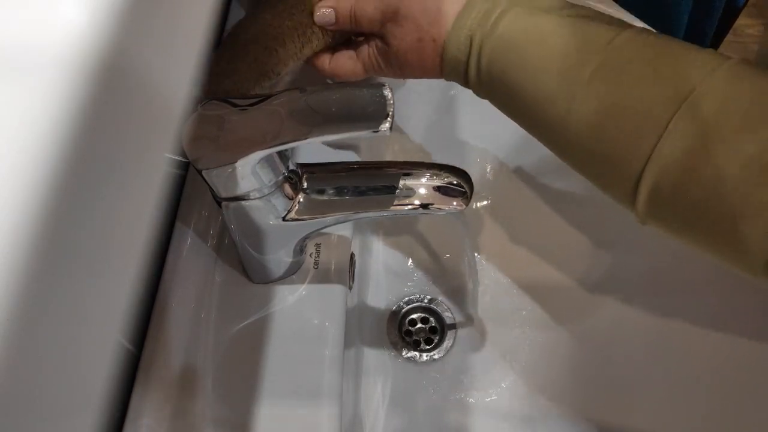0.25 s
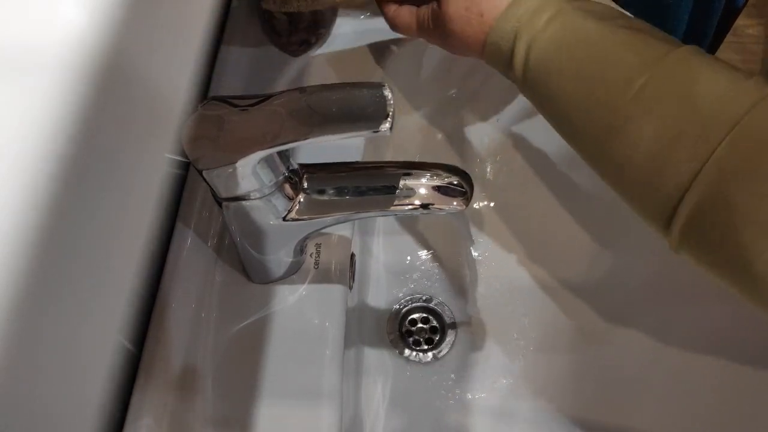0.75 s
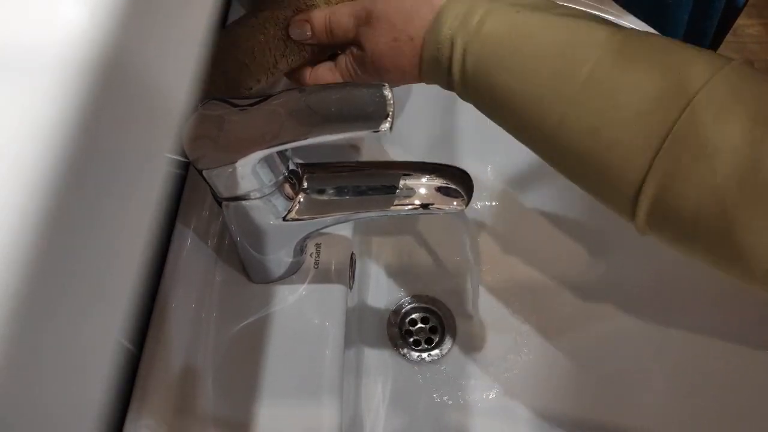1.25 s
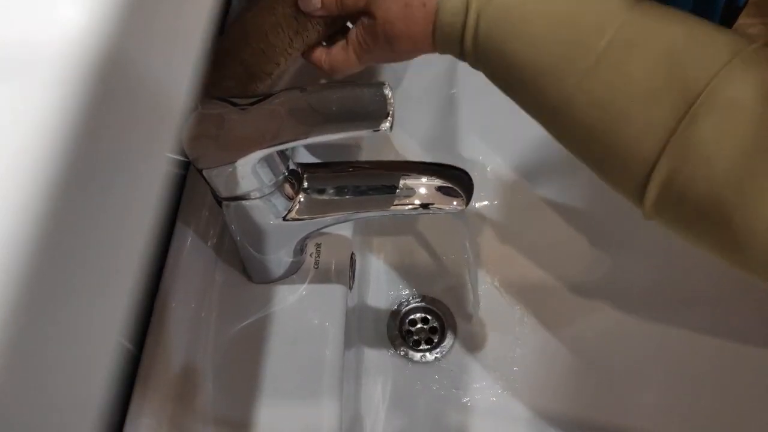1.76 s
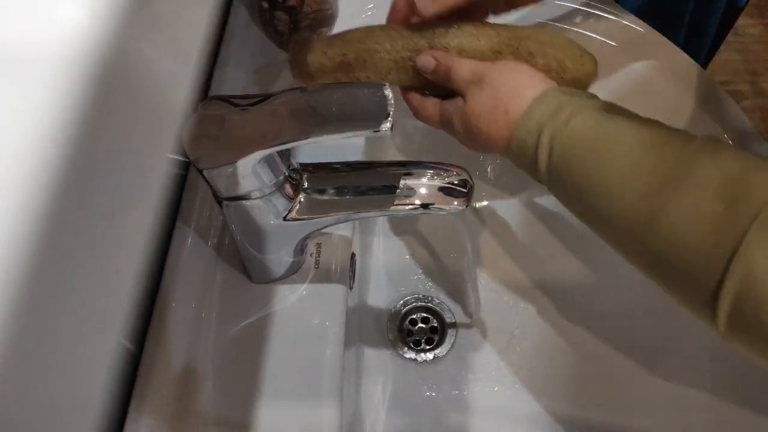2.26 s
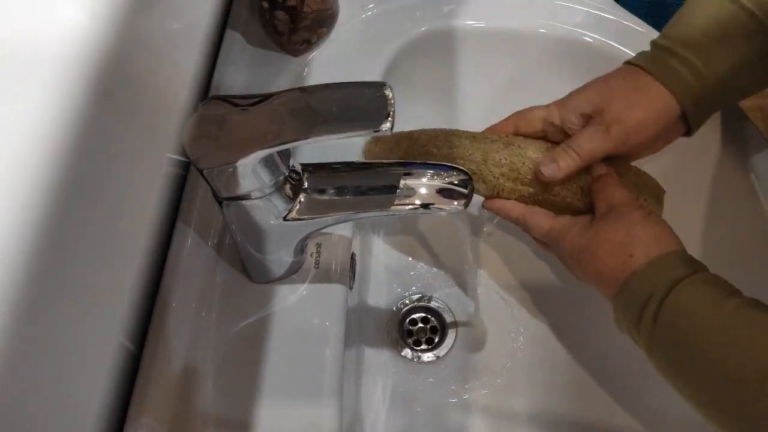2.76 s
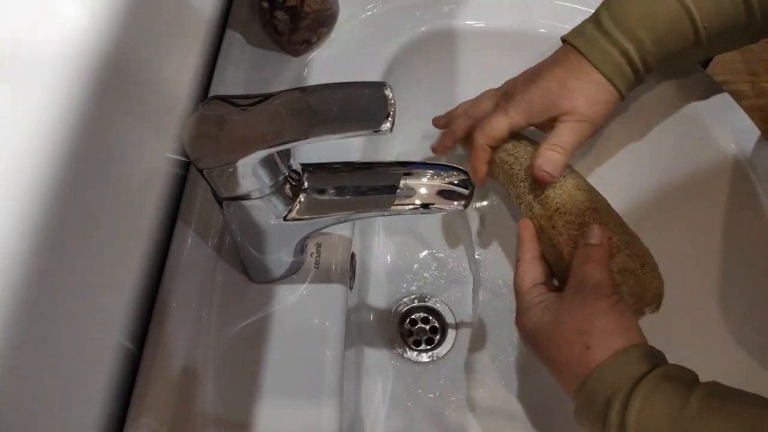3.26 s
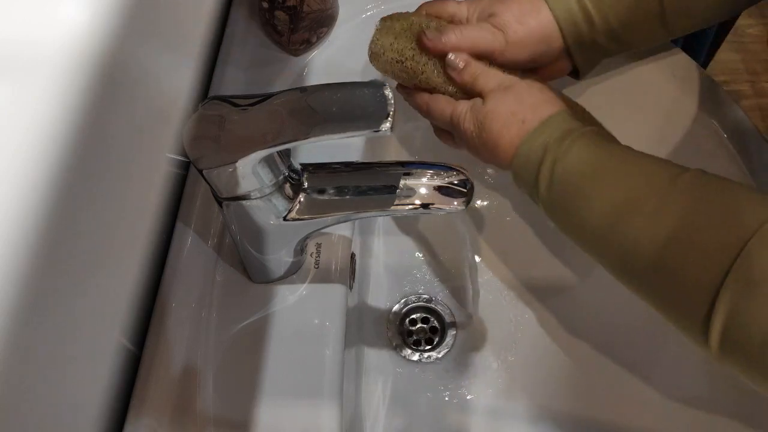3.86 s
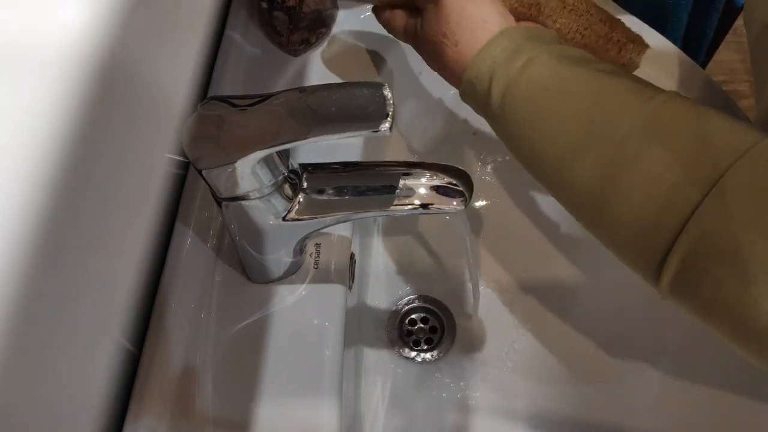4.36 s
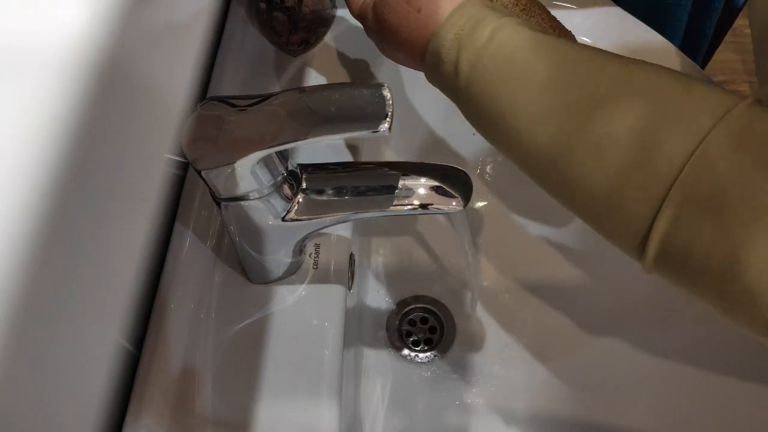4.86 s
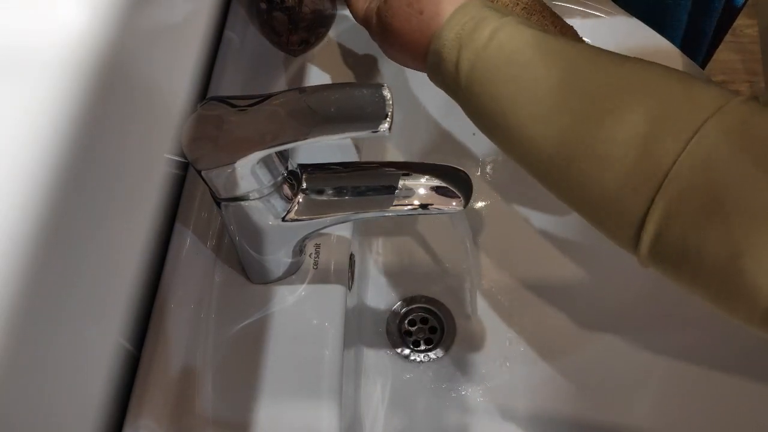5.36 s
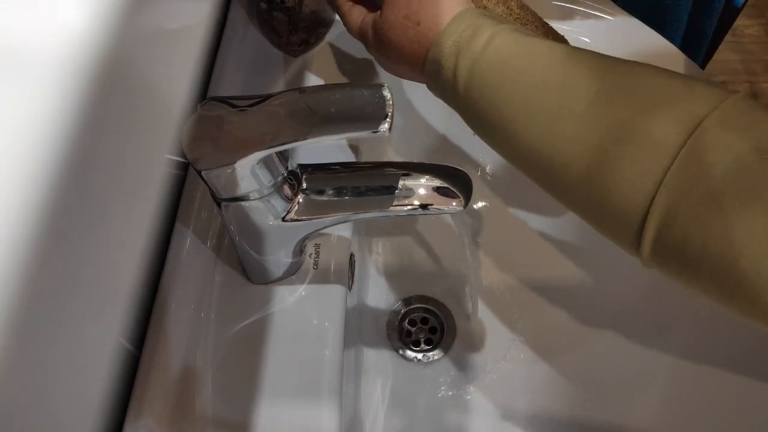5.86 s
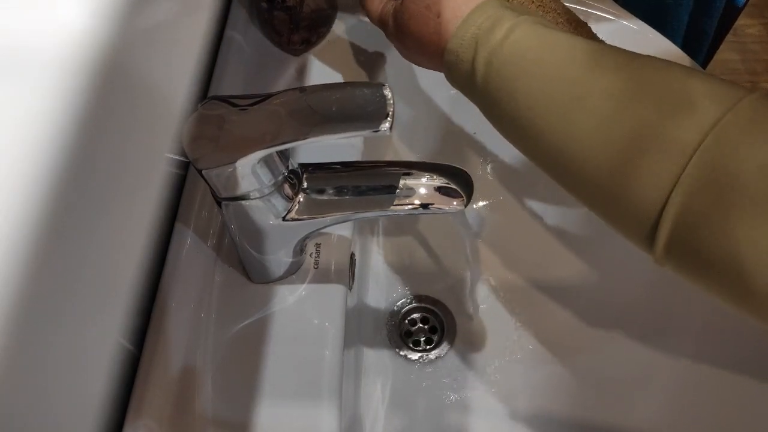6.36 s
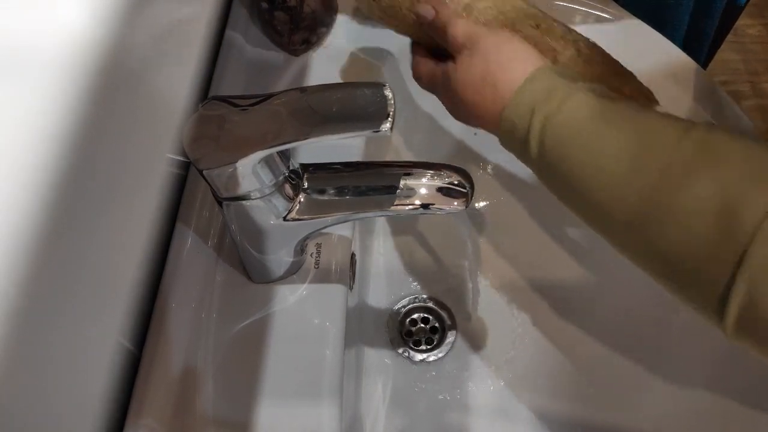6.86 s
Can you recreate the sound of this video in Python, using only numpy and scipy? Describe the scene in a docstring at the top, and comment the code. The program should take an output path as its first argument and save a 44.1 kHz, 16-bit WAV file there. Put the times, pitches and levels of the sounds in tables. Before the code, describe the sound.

Close up in a small bathroom, tap water hisses and splashes into a ceramic sink throughout, with tiny bubbles snapping. For the first two seconds a wet sponge scrubs the rim with hollow knocks. Light, wet squishes and a faint drain gurgle follow. From about four seconds the scrubbing and knocking return, drawing a low drone from the cabinet over a quiet room rumble.

```python
"""A tap runs into a ceramic basin, close by in a small bathroom. From the start its airy stream
fizzes with tiny bursting bubbles, spits now and then and drums on the basin floor. For the first
two seconds a hand works a wet sponge against the rim, knocking and rubbing so that the basin rings.
Then the sponge is wetted and squelches, and the drain gives one faint, low gurgle. Just after four
seconds a second round of strokes begins, and late in it the cabinet drones. The room rumbles softly."""
import sys
import numpy as np
from scipy import signal
from scipy.fft import rfft, irfft
from scipy.io import wavfile
from scipy.ndimage import uniform_filter1d

SR = 44100
rng = np.random.default_rng(int(sys.argv[2]) if len(sys.argv) > 2 else 0)


def wav_record(signal):
    """Record a signal, one row per channel, as 16-bit PCM in the file named by sys.argv[1]."""
    frames = np.transpose(np.atleast_2d(signal))
    bounded = np.clip(frames, -1, 1)
    # unit amplitude maps onto the largest positive 16-bit level
    quanta = np.round(bounded * 32767).astype(np.int16)
    wavfile.write(sys.argv[1], SR, quanta)


N = 313551
TIME = np.arange(N) / SR
HIGHEST_HZ = 15850

# How the splash swells and sinks as the hands disturb it: time_s, change_db
SPLASH_SWELLS = [(0.0, 1), (0.11, -1.5), (0.18, -4), (0.25, 2), (0.62, 1), (0.74, -0.5), (0.95, 0.5),
                 (1.3, -1.5), (1.9, -1), (2.13, 1.5), (2.4, -1.5), (3.4, 0), (4.4, 0), (4.9, -1), (5.9, -1),
                 (6.08, 1.5), (6.55, 0.5), (7.1, -0.5)]
# How strong the stream's hiss is from low to high: pitch_hz, level_db
STREAM_TONE = [(300, -21), (900, -24), (1300, -19), (2200, -14.5), (3100, -6), (3700, -6.5), (5000, -3),
               (6500, 3), (7500, 1), (9800, 1.5), (11800, 1.5), (14000, 5.5), (15000, 8.5), (16000, -24)]
# Pitches that the air in the bowl boosts or weakens: pitch_hz, width_hz, boost_db
BOWL_RESONANCES = [(1518, 137, 12.5), (1792, 33, 12), (1950, 90, 3), (2120, 190, 8.5), (2420, 34, 1),
                   (2605, 57, 11.5), (2920, 75, -7), (3120, 46, -14), (3585, 41, 1.5), (4990, 69, 9),
                   (5344, 35, 8.5), (6190, 39, 5.5), (7530, 110, 4.5), (7360, 120, 1.5), (8300, 160, 4),
                   (9170, 95, 8), (11100, 120, 6.5)]


def tap_stream(level_db):
    """Bubbles burst over a smooth hiss of foam; the jet flutters and the bowl shapes its tone."""
    fizz = bubbles(per_s=1100, spread_db=4.5, cycles=0.76, echo_db=-2.5)
    foam = amp(-1) * rng.standard_normal((2, N))
    drips = amp(-10.5) * bubbles(per_s=70, spread_db=4, cycles=3.5, echo_db=-6)
    wash = amp(-1) * unit_level(band(rng.standard_normal((2, N)), 390, 3900))  # the film of water
    water = fizz + foam + drips + wash
    # The stream stays in one place, so its echoes off the walls give a steady, hollow tone.
    mono = water.sum(0, keepdims=True) / np.sqrt(2)
    water += amp(-6.5) * signal.oaconvolve(mono, echoes(fade_s=0.044), axes=1)[:, :N]
    # Cut the sound into short slices, so that each pitch can waver by itself.
    hz, t, slices = signal.stft(water, SR, nperseg=512, noverlap=384)
    patches = uniform_filter1d(rng.standard_normal((len(t), len(hz))), size=8, axis=0)
    patches = unit_level(uniform_filter1d(patches, size=14, axis=1)).T
    flutter = wobble(len(t), smooth=4)
    swell = np.interp(t, *np.transpose(SPLASH_SWELLS)) + 0.77 * surges(t)
    fizz_swell = at_pitch([(8000, 0), (12000, 0.85)], hz)[:, None] * 0.84 * surges(t)
    depth = at_pitch([(2500, 0.13), (5500, 0.89)], hz)[:, None]  # the low wash is steadier than the spray
    slices = slices * amp(depth * (swell + fizz_swell + 0.37 * patches + 1.08 * flutter))
    water = signal.istft(slices, SR, nperseg=512, noverlap=384)[1][:, :N]
    hz = np.fft.rfftfreq(N, 1 / SR)
    bowl_db = sum(db / (1 + (2 * (hz - pitch) / width) ** 2) for pitch, width, db in BOWL_RESONANCES)
    water = irfft(rfft(water) * amp(at_pitch(STREAM_TONE, hz) + bowl_db), N)
    return amp(level_db) * unit_level(water) * amp([[-1], [0]])  # a little softer on the left


def bubbles(per_s, spread_db, cycles, echo_db, sizes=40):
    """Bubbles of many sizes burst at random, each size at its own spot in the bowl."""
    out = np.zeros((2, N))
    for hz in np.linspace(3500, 15500, sizes):
        chance = rng.random(N)
        strength = np.minimum(rng.exponential(1, N), 3)
        paths = amp(echo_db) * echoes(fade_s=0.23, size=2048) + echoes(fade_s=0.0092, size=2048)
        paths[[0, 1], rng.integers(0, 4, 2)] += 1  # the straight path to each ear
        burst = signal.fftconvolve(paths, pop(hz, cycles)[None], axes=1)
        for i in np.flatnonzero(chance < per_s / sizes / SR):
            add(out, i / SR, amp(spread_db * strength[i]) * burst)
    return unit_level(out)


def pop(hz, cycles, size=192):
    """One bursting bubble: a tiny tone that swells for the given cycles, then dies."""
    turns = np.arange(size) / SR * min(hz, HIGHEST_HZ)
    wave = turns * np.exp(-turns / cycles) * np.sin(2 * np.pi * turns)
    return wave / np.linalg.norm(wave)


# Larger bubbles that snap in the stream and on the sponge: start_s, strength_db, pitch_hz, spray_db
BUBBLE_SNAPS = [(0.3681, -25.5, 9830, -3), (0.4363, -31.5, 7250, 2), (0.5242, -30.5, 6600, -6),
                (0.6396, -31, 12100, 6), (0.9535, -30, 9700, -8), (1.0027, -30.5, 6800, 1),
                (1.209, -29, 14400, 3), (1.487, -31, 6800, -2), (1.6505, -25, 11000, 0),
                (1.8102, -30, 14200, 4), (1.9762, -27.5, 8700, -2), (2.2058, -30.5, 6460, 5),
                (2.3195, -32, 8000, -1), (3.224, -29, 7300, -6), (3.6732, -28.5, 5400, -1),
                (3.6989, -25, 9100, -5), (5.3486, -34, 7360, 10), (5.6404, -28, 14400, -3),
                (5.8531, -31, 14400, 0), (6.0585, -32.5, 6500, 0), (6.6866, -31, 8100, 0),
                (6.849, -29, 14200, 4), (7.0716, -28, 13900, -4)]


def spits(gain_db):
    """Larger bubbles snap in a quick cluster and throw a short spray; small ones join at random."""
    out = np.zeros((2, N))
    small = [(start, -33, 6000 + 8500 * dice, 5) for start, dice in random_times(per_s=2.5)]
    for start, strength_db, hz, spray_db in BUBBLE_SNAPS + small:
        cluster = amp(spray_db) * echoes(fade_s=0.13) + echoes(fade_s=0.011)
        cluster[:, 0] += 0.5
        snap = signal.fftconvolve(cluster, pop(hz, cycles=0.79)[None], axes=1)
        snap /= snap[:, :SR // 400].std()
        treble_db = at_pitch([(9000, -0.99), (14000, -1.3)], hz)
        add(out, start + 0.0008, amp(strength_db + gain_db + treble_db) * snap)
    return out


# The two rounds in which the sponge lies on the rim: start_s, end_s
SPONGE_ROUNDS = [(0.0, 2.3), (4.25, 6.4)]
# Knocks on the basin, plus one faint, low gurgle of the drain at 3.13 s:
# start_s, force_db, contact_ms, spot_db (how much the spot adds to the body of the sound)
KNOCKS_AND_GURGLE = [(0.214, -42.5, 1.3, -4.5), (0.317, -31.5, 1.4, -15.5), (0.448, -45, 0.14, -2.5),
                     (0.582, -54, 4.2, 0), (0.842, -46.5, 0.38, -1.5), (1.137, -45, 0.14, -2.5),
                     (1.259, -47.5, 1.05, -8), (1.412, -44, 0.15, -3), (1.687, -47, 0.13, -3),
                     (1.99, -47.5, 0.3, -1.5), (2.113, -59.5, 0.6, -4), (2.161, -33.5, 1.28, -20),
                     (3.126, -62.5, 0.8, 1), (4.07, -60, 0.5, -4), (4.544, -52.5, 0.39, -1),
                     (4.78, -50.5, 3.8, -7), (5.009, -51.5, 0.41, -2), (5.411, -55, 1, 2),
                     (5.433, -45, 0.99, -0.5), (5.473, -54.5, 0.8, -19), (5.744, -44.5, 3, -10),
                     (5.933, -56, 1.2, 0), (5.948, -53.5, 0.87, -14), (6.102, -54.5, 1.2, 1),
                     (6.117, -53, 0.1, -12), (6.125, -49, 0.8, -1.5), (6.278, -46, 1, -1),
                     (6.425, -45.5, 0.42, -2.5), (6.566, -53.5, 0.7, -8), (6.613, -43.5, 0.65, 0),
                     (6.72, -50, 0.22, -6)]


def knocks_and_gurgle(boom_db, body_db, ring_db, clack_db):
    """Soft knocks boom, hard ones ring and clack; the drain's gurgle sounds the same basin notes."""
    out = np.zeros((2, N))
    light_taps = [(start, -64 + 4 * dice, 0.91, 0)
                  for begin, end in SPONGE_ROUNDS for start, dice in random_times(2.0, begin, end)]
    for start, force_db, contact_ms, spot_db in KNOCKS_AND_GURGLE + light_taps:
        contact_s = contact_ms / 1000
        blow = basin_ring()
        t = np.arange(blow.shape[1]) / SR
        blow *= 1 - np.exp(-t / (0.26 * contact_s))  # a longer contact starts more gently
        # Late in round two the sponge presses on another spot, which favours the cabinet's lowest note.
        boom_hz = (185, 310) if start < 5.5 else (150, 255)
        boom, body = band(blow, *boom_hz), -band(blow, 340, 620)
        ring, clack = band(blow, 700, 1300), -band(blow, 1550, 4000)
        muting = np.hypot(1, contact_s * np.array([0, 460, 915, 2470]))  # high parts are muted most
        gains = amp(force_db + np.array([boom_db, body_db + spot_db, ring_db, clack_db])) / muting
        parts = [part / part[:, :SR // 25].std() for part in (boom, body, ring, clack)]
        add(out, start, sum(gain * part for gain, part in zip(gains, parts)))
    return out * amp([[-1], [0]])


# Notes at which the basin and its cabinet ring: pitch_hz, level_db, fade_s (time to drop by 60 dB)
BASIN_NOTES = [(143.4, -7.5, 0.6), (169.7, 4.5, 0.34), (226, -7, 0.26), (243.3, -1.5, 0.13),
               (281.4, -1.5, 0.25), (351, -3, 0.19), (376.3, -2, 0.16), (474.4, 0.5, 0.14),
               (667.4, -1.5, 0.1), (741, -11, 0.22), (843, -14, 0.028), (887, -19.5, 0.11),
               (929, -4.5, 0.091), (1043, -2.5, 0.03), (1120, -7, 0.1), (1218, -4, 0.11),
               (1322, -9.5, 0.11), (1570, -0.5, 0.055), (1693, -14.5, 0.18), (2060, -7.5, 0.1),
               (2510, -16, 0.11), (2660, -4, 0.11)]
# The dense clatter between those notes: pitch_hz, level_db
CLATTER_TONE = [(60, -46), (130, -58), (300, -1), (600, 6), (1200, -6.5), (1800, -6.5), (3000, 1.5),
                (4500, -7), (9000, -27)]
# How long that clatter lasts: pitch_hz, fade_s
CLATTER_FADES = [(150, 0.2), (500, 0.099), (1000, 0.2), (3000, 0.23), (8000, 0.086)]


def basin_ring(size=16384):
    """The basin's answer to one blow: a clatter, and notes whose balance depends on where it is hit."""
    t = np.arange(size) / SR
    hz, db, fade_s = np.transpose(BASIN_NOTES)[:, :, None]
    weight, side, shift = rng.standard_normal((3, len(BASIN_NOTES), 1))
    fades = amp(db + 3 * weight - 60 * t / fade_s)
    phase = 2 * np.pi * hz * t + 0.72 * shift
    lag = 0.31 * side * np.minimum(hz / 1000, 1)  # higher notes reach the two ears out of step
    notes = np.array([(fades * np.sin(phase + ear * lag)).sum(0) for ear in (-1, 1)])
    slice_hz, slice_s, slices = signal.stft(noise(CLATTER_TONE, size), SR, nperseg=256)
    slices *= amp(-60 * slice_s / at_pitch(CLATTER_FADES, slice_hz)[:, None])
    clatter = signal.istft(slices, SR, nperseg=256)[1][:, :size]
    punch = 1 + 1.34 * np.exp(-t / 0.0062)  # the blow is louder than the ring it leaves
    onset = 1 - np.exp(-t / 0.00026)
    return (notes * np.sqrt(punch) + amp(0.5) * clatter * punch) * onset


def sponge_rubbing(gain_db, cabinet_db):
    """The sponge grips and slips along the rim, which keeps the basin's low notes humming."""
    grip = amp(7 * np.tanh(wobble(N, smooth=900)))
    rub_tone = [(80, -6), (145, 5), (170, -4), (225, 0.5), (280, 4), (400, -5.5), (800, -5), (2000, -4)]
    friction = noise(rub_tone) * grip
    hum = np.zeros((2, N))
    for hz, db, fade_s in BASIN_NOTES:
        sharpness = hz * fade_s * np.pi / np.log(1000)  # a note that rings longer is purer
        hum += amp(db) * fade_s * signal.lfilter(*signal.iirpeak(hz, sharpness, SR), friction)
    cabinet = unit_level(band(hum, 158, 182)) * np.interp(TIME, [5, 5.5], [0, 1])  # drones in late
    return amp(gain_db) * (unit_level(band(hum, 130, 2400)) + amp(cabinet_db) * cabinet) * pressure()


# Strokes of the sponge along the rim: start_s, length_s, strength_db
SPONGE_STROKES = [(0.0, 0.024, -53), (0.129, 0.18, -54), (0.48, 0.15, -59), (0.789, 0.084, -51),
                  (0.923, 0.078, -64), (1.14, 0.17, -58), (1.443, 0.066, -49), (1.691, 0.12, -53.5),
                  (1.984, 0.22, -55), (4.31, 0.041, -57), (4.766, 0.064, -54), (4.968, 0.083, -54),
                  (5.318, 0.05, -58.5), (5.437, 0.093, -51), (5.722, 0.1, -50.5), (5.942, 0.22, -52.5),
                  (6.27, 0.054, -49), (6.458, 0.15, -58.5), (6.69, 0.2, -55.5)]


def pressure(resting_db=-65.5, grip_s=0.007, release_s=0.031):
    """How hard the sponge drags: lightly all through a round, harder in each stroke."""
    out = np.zeros(N)
    resting = [(start, end - start, resting_db) for start, end in SPONGE_ROUNDS]
    for start, length, db in SPONGE_STROKES + resting:
        t = TIME - start
        build_up = np.clip(t / grip_s, 0, 1)
        let_go = np.exp(-np.clip((t - length) / release_s, 0, 20))
        out = np.maximum(out, amp(db) * build_up * let_go)
    return out


# Water squeezed through the sponge: start_s, length_s, first_pitch_hz, last_pitch_hz, level_db
SPONGE_SQUEEZES = [(0.605, 0.047, 4760, 4500, -50), (0.863, 0.071, 5600, 4860, -50),
                   (2.40, 0.11, 8000, 9250, -49), (2.731, 0.055, 5740, 4330, -47),
                   (3.197, 0.022, 4730, 5260, -45), (3.243, 0.078, 6900, 7350, -46),
                   (3.674, 0.022, 4400, 6540, -41.5), (3.679, 0.095, 7400, 10000, -45.5),
                   (4.328, 0.15, 5540, 4730, -52), (5.345, 0.037, 5100, 5200, -48),
                   (6.038, 0.06, 5470, 4460, -50), (6.508, 0.035, 4000, 4320, -47.5),
                   (6.661, 0.064, 4900, 6030, -49.5)]


def sponge_squelches(width_hz, grain_db):
    """A crowd of tiny bubbles slides in pitch as the pores open or close; faint seeps come at random."""
    out = np.zeros((2, N))
    seeps = []
    for start, dice in random_times(per_s=1.2):
        hz = 5100 * 1.4 ** (dice - 0.5)
        seeps.append((start, 0.075, hz, 0.76 * hz, -55.5))
    low_pass = signal.butter(2, width_hz / 2, fs=SR)
    for start, length, first_hz, last_hz, db in SPONGE_SQUEEZES + seeps:
        size = round(length * SR)
        crowd = rng.standard_normal((2, SR // 4)) * amp(grain_db * wobble(SR // 4, smooth=90))
        slide = np.exp(2j * np.pi * np.cumsum(np.geomspace(first_hz, last_hz, size)) / SR)
        # Keep only the noise that lies near the sliding pitch.
        hiss = (slide * signal.lfilter(*low_pass, crowd[:, :size] / slide)).real
        add(out, start, amp(db) * unit_level(hiss * signal.windows.tukey(size, 0.5)))
    return out


# How hard the water drums on the basin floor: time_s, strength_db
DRUM_STRENGTH = [(0.0, -64), (1.5, -69.5), (2.5, -64), (2.9, -60.5), (4.1, -62), (5.0, -63.5), (7.1, -62.5)]
# The tone of that drumming: pitch_hz, level_db
DRUM_TONE = [(90, -16), (165, 3), (195, -12), (222, 8.5), (260, -13), (300, 8.5), (420, -5), (600, 3),
             (740, 3.5), (850, -8), (1300, -5.5), (2500, -9.5)]


def water_drumming(gain_db, uneven_db):
    """The falling water drums unevenly on the basin floor."""
    lumps = amp(uneven_db * wobble(N, smooth=900))
    strength_db = np.interp(TIME, *np.transpose(DRUM_STRENGTH))
    return amp(gain_db + strength_db) * unit_level(noise(DRUM_TONE) * lumps)


# The tone of the room's rumble: pitch_hz, level_db
RUMBLE_TONE = [(8, -6.5), (20, -10), (28, 2.5), (38, -2.5), (50, -20), (63, -15.5), (85, -27.5),
               (130, -27.5), (300, -28.5), (1000, -99)]


def room_rumble(level_db):
    """A deep, steady noise fills the room."""
    return amp(level_db) * noise(RUMBLE_TONE)


# How alike the two ears hear a noise: pitch_hz, likeness (0 unrelated, 1 the same)
EAR_LIKENESS = [(30, 0.97), (70, 0.44), (170, 1), (300, 0.97), (640, 1), (1400, 0.74), (3000, 0.076),
                (15000, 0.084)]


def noise(tone, size=N):
    """Stereo noise with the given tone, alike on both sides in the bass."""
    hz = np.fft.rfftfreq(size, 1 / SR)
    left, other = rfft(rng.standard_normal((2, size)))
    likeness = at_pitch(EAR_LIKENESS, hz)
    right = likeness * left + np.sqrt(1 - likeness ** 2) * other
    return unit_level(irfft(np.array([left, right]) * amp(at_pitch(tone, hz)), size))


def echoes(fade_s, size=4096):
    """Dense echoes off the bowl and the tiles, different on each side."""
    t = np.arange(size) / SR
    tail = rng.standard_normal((2, size)) * amp(-60 * t / fade_s) * (1 - np.exp(-t / 0.00017))
    return tail / np.linalg.norm(tail, axis=1, keepdims=True)


def random_times(per_s, start=0, end=N / SR):
    """Random moments at an average rate, each with its own dice roll from 0 to 1."""
    gap, dice = rng.random((64, 2)).T
    times = start - np.cumsum(np.log(1 - gap)) / per_s
    return list(zip(times[times < end], dice))


def surges(t, every_s=0.07):
    """Random swells and dips at an even pace."""
    heights = rng.standard_normal(1024)
    return unit_level(np.interp(t / every_s, np.arange(len(heights)), heights))


def wobble(size, smooth):
    """A random wavering; smoothing over more steps makes it slower."""
    return unit_level(uniform_filter1d(rng.standard_normal(size), smooth))


def band(x, low_hz, high_hz):
    """Keeps the sound between two pitches."""
    return signal.sosfilt(signal.butter(2, [low_hz, high_hz], "band", fs=SR, output="sos"), x)


def at_pitch(points, hz):
    """Looks up a value between rows of (pitch_hz, value), spacing octaves evenly."""
    pitches, values = np.transpose(points)
    return np.interp(np.log(hz + 1), np.log(pitches + 1), values)


def add(mix, start_s, sound):
    """Adds a stereo sound to the mix at a given time."""
    part = mix[:, round(start_s * SR):][:, :sound.shape[1]]
    part += sound[:, :part.shape[1]]


def amp(db):
    """Turns decibels into a multiplier."""
    return 10 ** (np.asarray(db) / 20)


def unit_level(x):
    """Scales a signal to an average (rms) level of one."""
    return x / np.sqrt(np.mean(x ** 2) + 1e-20)


def scene():
    """Running water, the working sponge, the drain and the room, heard together."""
    water = tap_stream(level_db=-41) + spits(gain_db=-4) + water_drumming(gain_db=3, uneven_db=1.5)
    basin = knocks_and_gurgle(boom_db=-5.5, body_db=-1.5, ring_db=-3.5, clack_db=-1.5)
    sponge = sponge_rubbing(gain_db=-2.5, cabinet_db=-6.5) + sponge_squelches(width_hz=1720, grain_db=3)
    return water + basin + sponge + room_rumble(level_db=-57.5)


def record(dry):
    """Cuts away the very highest treble."""
    low_pass = signal.firwin(701, HIGHEST_HZ, window=("kaiser", 9), fs=SR)
    return signal.oaconvolve(dry, low_pass[None], "same")


dry = scene()
out = record(dry)
wav_record(out)
```